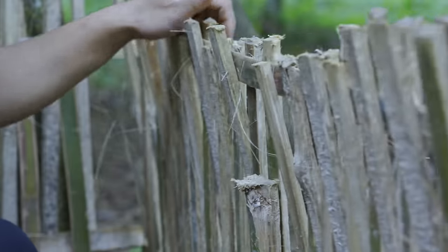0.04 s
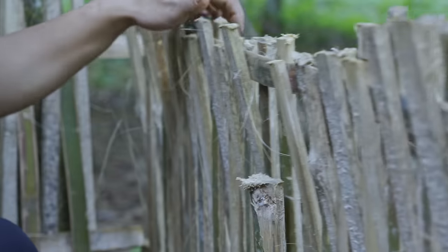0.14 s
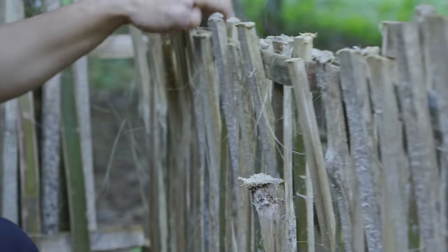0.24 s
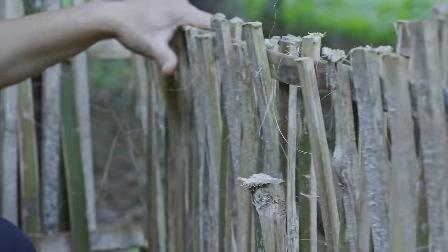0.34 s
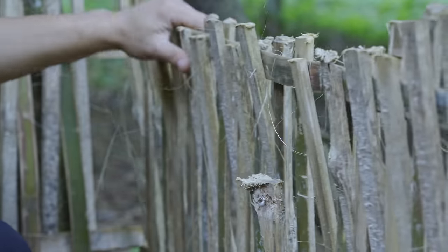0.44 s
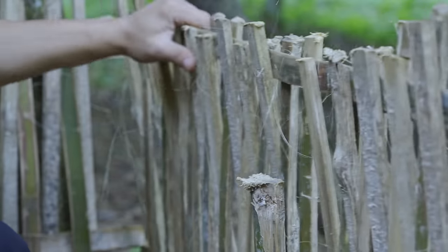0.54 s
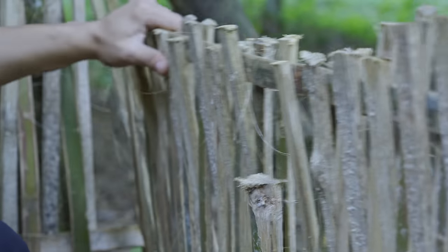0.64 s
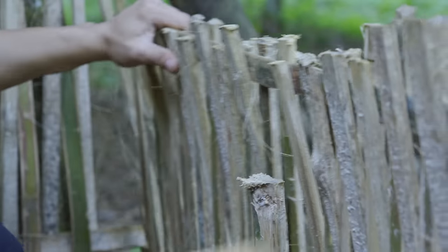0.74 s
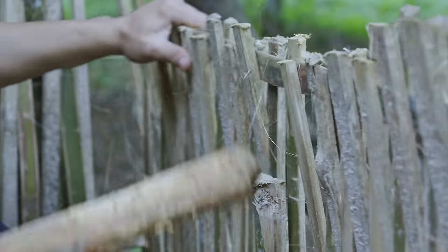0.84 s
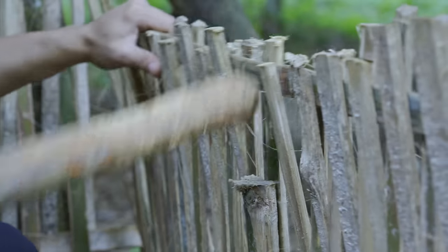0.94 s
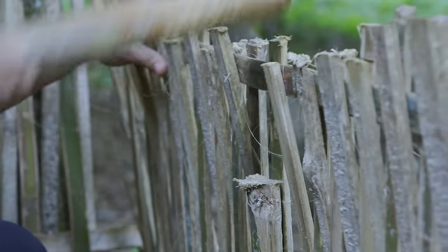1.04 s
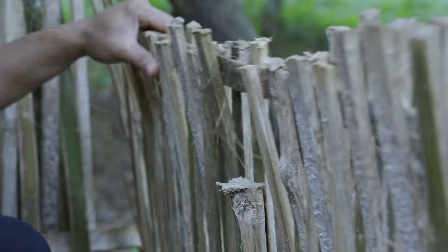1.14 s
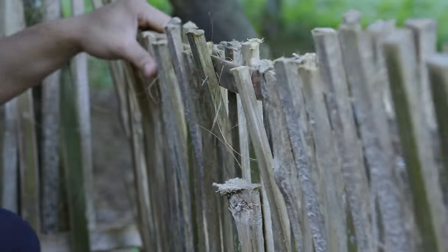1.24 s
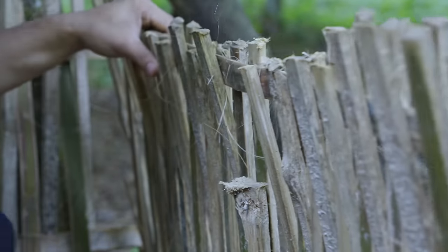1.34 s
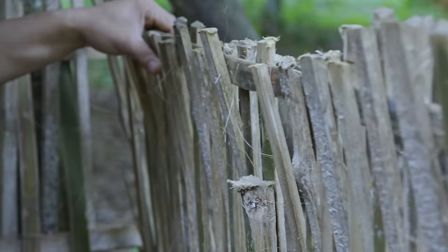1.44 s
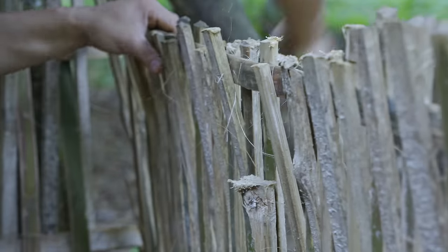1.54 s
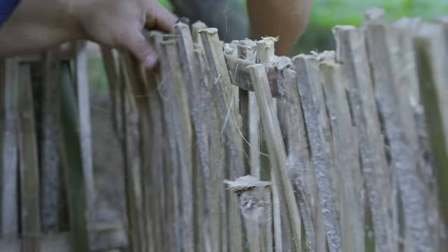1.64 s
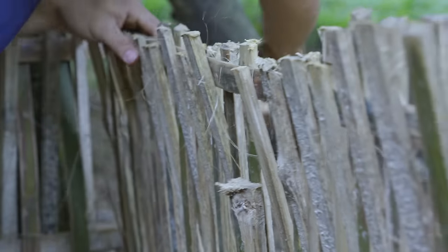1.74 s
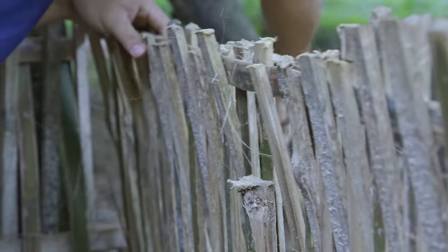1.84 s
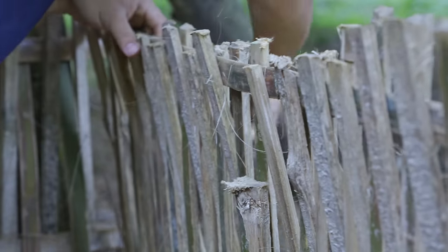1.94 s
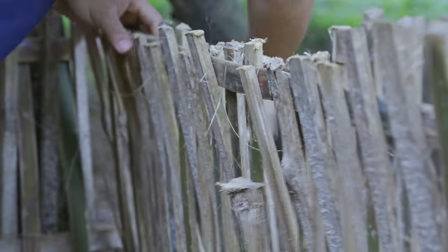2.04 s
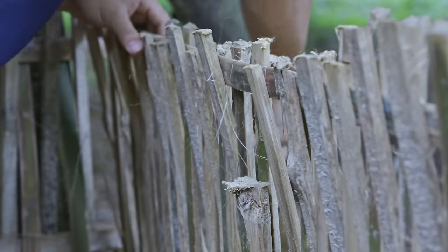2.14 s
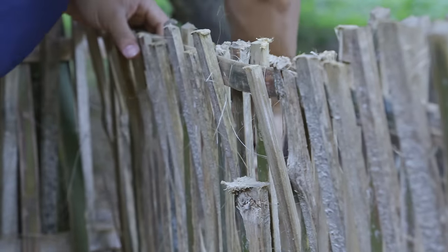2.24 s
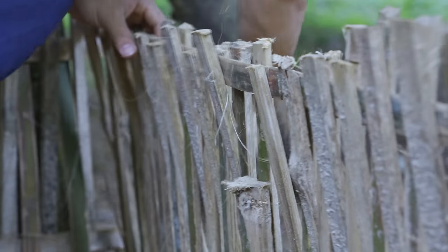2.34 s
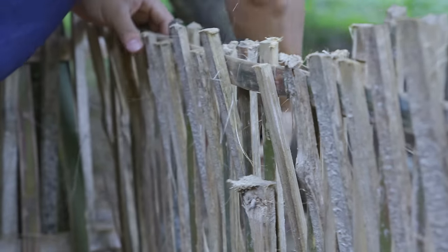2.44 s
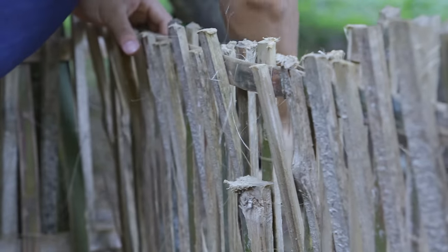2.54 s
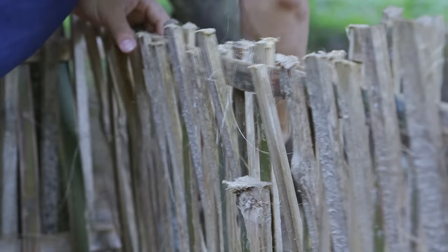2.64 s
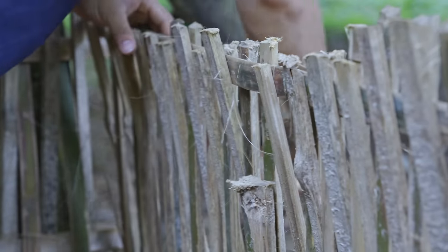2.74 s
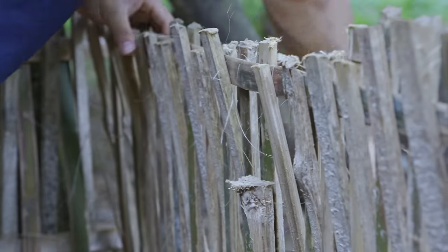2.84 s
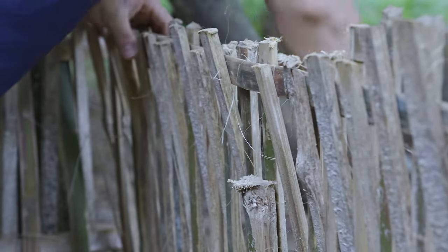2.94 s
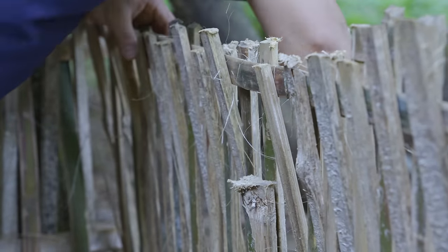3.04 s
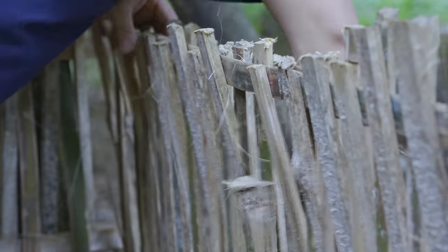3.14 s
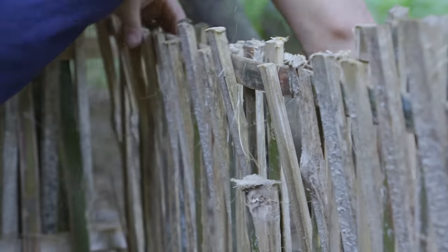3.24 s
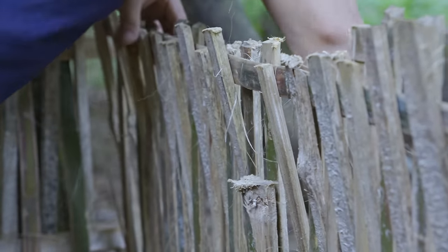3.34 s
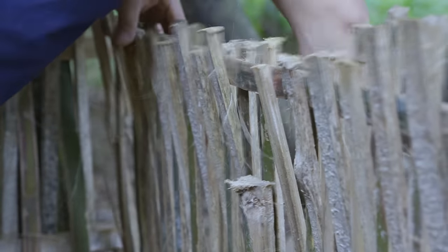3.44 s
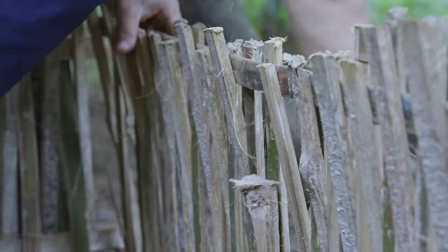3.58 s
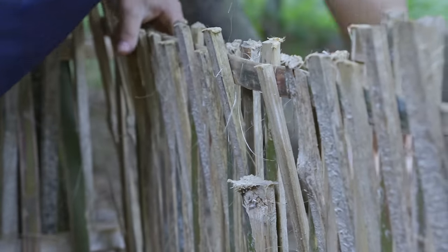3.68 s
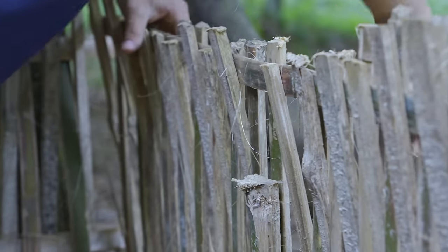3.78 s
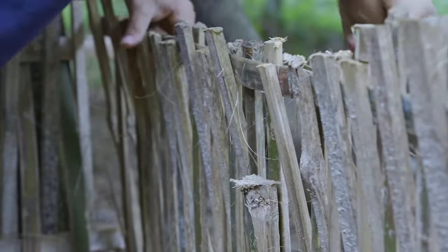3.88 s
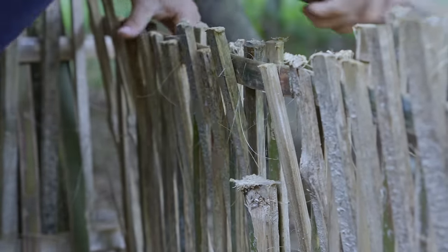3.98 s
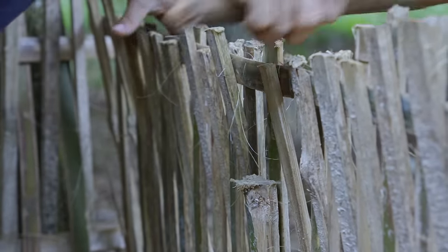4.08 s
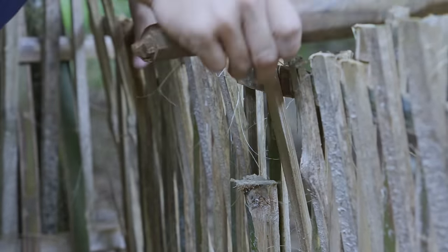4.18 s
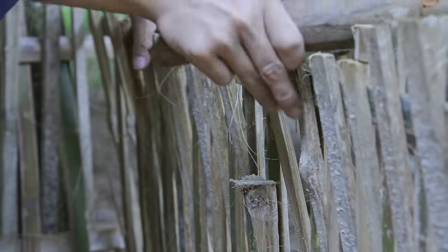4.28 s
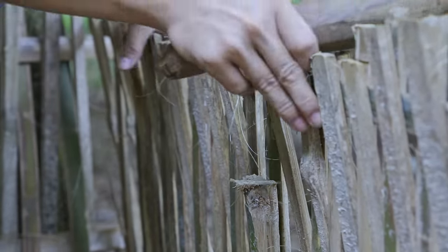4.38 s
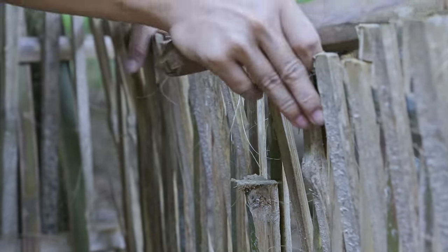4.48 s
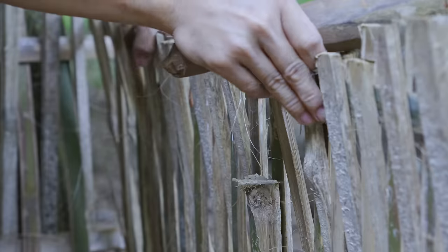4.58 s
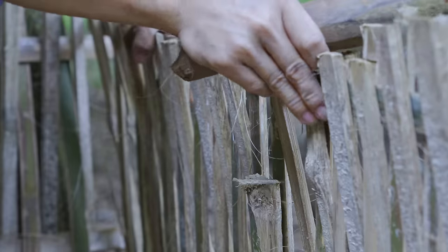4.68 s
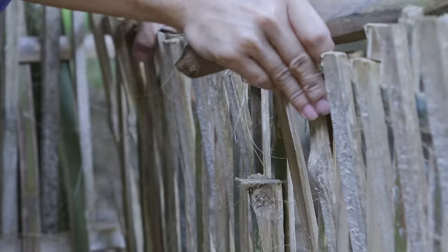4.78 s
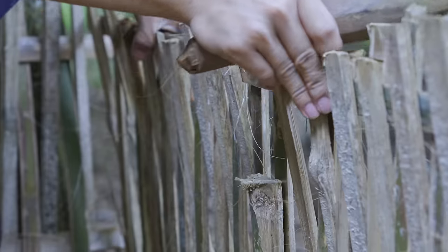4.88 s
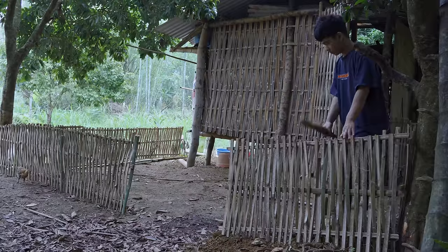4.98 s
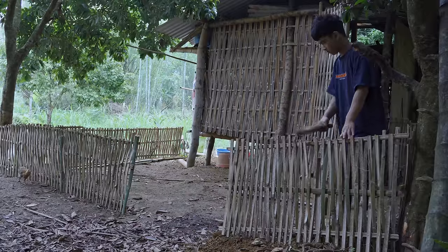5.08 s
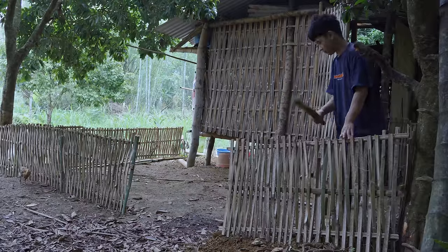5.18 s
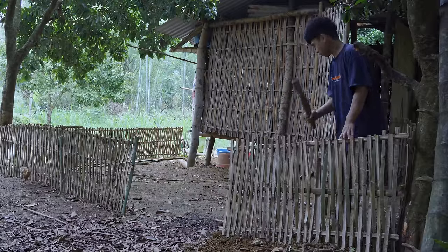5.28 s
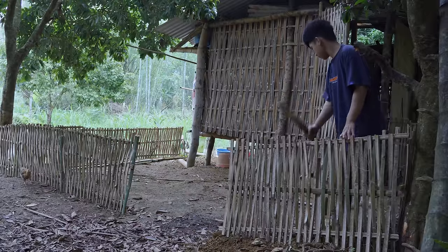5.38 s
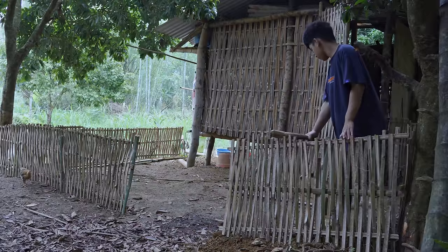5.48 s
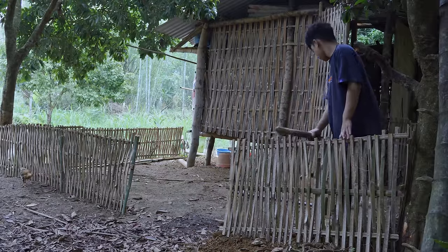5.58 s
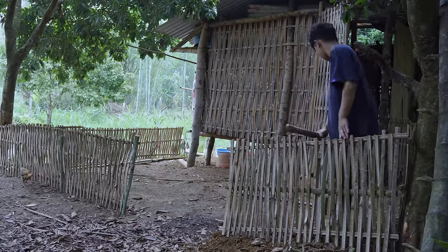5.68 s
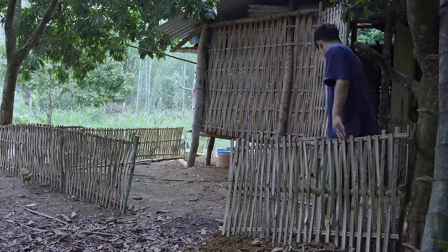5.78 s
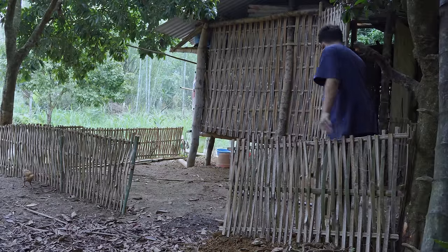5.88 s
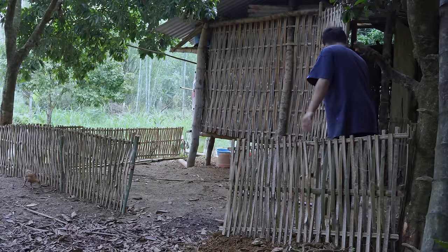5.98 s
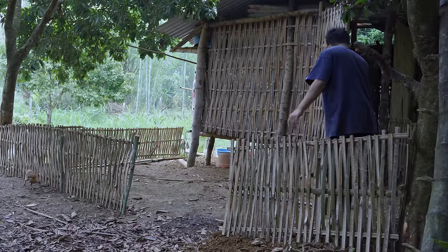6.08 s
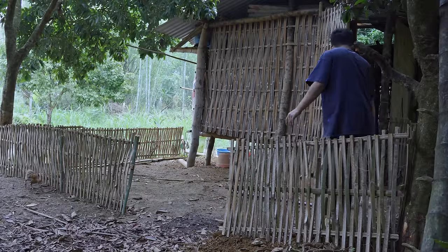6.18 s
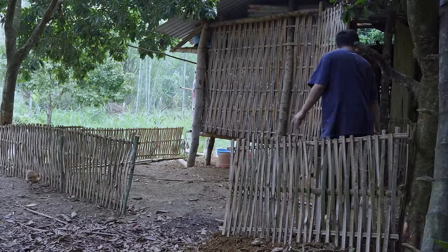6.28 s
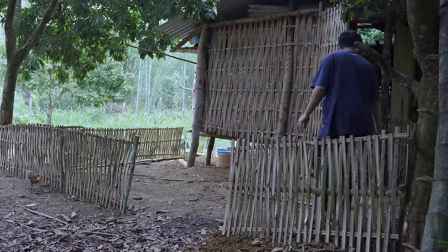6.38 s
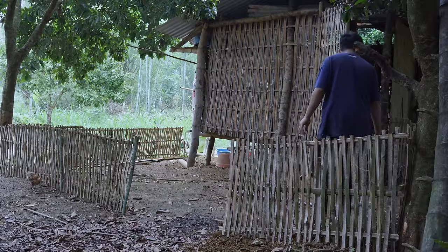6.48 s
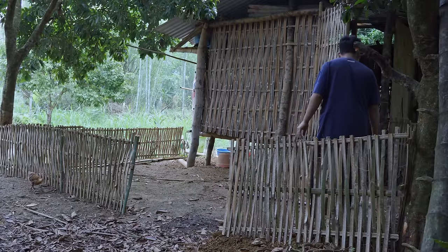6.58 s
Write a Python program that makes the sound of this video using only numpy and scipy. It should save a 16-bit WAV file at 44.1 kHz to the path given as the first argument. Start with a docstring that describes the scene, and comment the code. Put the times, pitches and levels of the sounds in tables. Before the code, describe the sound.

Close by, hands rub and push a dry bamboo fence with faint ticks and hollow knocks. Then six hard, bright mallet blows come about a third of a second apart, each followed by brief slat rattle and clacks. After quiet handling ticks, two knocks sound a few steps away with a short echo. Crickets and cicadas trill throughout the open yard; a hen clucks faintly.

```python
"""A wooden mallet drives bamboo stakes in a slatted fence, close by: noise cracks over damped modes, then slats
rattle and clack back. Hands rub, push and shift the slats around the blows; the cane ticks, dull or bright.
Two last knocks fall a few steps away, beside a hut, with a delayed echo.
Crickets and cicadas (noise bands, gliding resonances) sing all round the yard; a hen clucks faintly (hoarse sines).
Under it lie open-air hush and the drone of a far engine, both shaped noise."""
import sys
import numpy as np
from scipy import signal
from scipy.fft import rfft, irfft, next_fast_len
from scipy.io import wavfile
from scipy.ndimage import map_coordinates

SR = 44100
rng = np.random.default_rng(int(sys.argv[2]) if len(sys.argv) > 2 else 0)


def dump_mix(stems):
    """Bounce the given channels to the path in sys.argv[1] as a 16-bit WAV at rate SR."""
    frames = np.atleast_2d(stems).T  # one column per channel
    limited = np.clip(frames, -1, 1)  # hard clip at full scale
    pcm = np.round(limited * 32767).astype(np.int16)
    wavfile.write(sys.argv[1], SR, pcm)


N = 291942

# Event levels are relative within a table; some layers add a trim.
# Mallet blows. Each row: start in seconds, level in dB, stake pitch in Hz, stake ring in dB against the crack,
# fence rattle in dB, time the fence keeps shaking in seconds.
BLOWS = [(1.685, -5.5, 1684, -1.5, -22.5, 0.053), (2.022, -4.5, 1500, -8, -22, 0.055),
         (2.35, -4.5, 1440, -22, -20, 0.034), (2.667, -5.5, 1510, -1, -22, 0.026),
         (3.14, -5, 1510, -5, -21.5, 0.051), (3.474, -5.5, 1650, -22, -22, 0.037)]
# Slats falling back on each other. Each row: start in seconds, level in dB.
CLACKS = [(2.215, -20.5), (2.5015, -20), (2.5432, -23), (2.8793, -28), (3.236, -14), (3.2527, -15.5),
          (3.556, -7), (3.5736, -7), (3.6122, -21.5)]
# Hollow knocks of the pushed fence. Each row: start in seconds, level in dB, loss per bounce in dB.
KNOCKS = [(0.704, -24, -1), (0.9618, -20, 2), (1.05, -26.5, 12), (1.062, -23, 12), (1.397, -34.5, 23),
          (4.276, -33.5, 14)]
# Short dry ticks of the cane, each with its own treble: dull around 0.55-0.6 and 1.02 s, mostly brighter after
# 4 s. # Each row: start in seconds, level in dB, treble in dB (before an offset).
TICKS = [(0.317, -29, -20), (0.5531, -20, -28), (0.581, -25, -26), (0.598, -26.5, -33), (1.023, -21.5, -26),
         (4.1355, -27, -10), (4.4775, -20, -10.5), (4.525, -27, -38), (4.6319, -28, -14)]
# Knocks by the hut. Each row: start in seconds, level in dB, ring in dB against the crack.
FAR_KNOCKS = [(5.0954, -13, -10), (5.491, -9, -8)]
# Panel shoved. Each row: start in seconds, swell time in seconds, level in dB.
SHOVES = [(.66, 0.09, -56), (.985, 0.031, -38.5), (1.08, 0.054, -57), (4.279, 0.029, -56.5)]
# Hen clucks. Each row: start in seconds, length in seconds, start pitch in Hz, end pitch in Hz, level in dB.
CLUCKS = [(3.824, 0.057, 576, 560, -43.5), (4.42, 0.054, 547, 513, -51), (4.60, .12, 508, 554, -56.5),
          (5.077, 0.043, 850, 814, -35)]
# Hand sliding over the canes. Each row: start in seconds, length in seconds, level in dB.
RUBS = [(.25, .45, -60), (4.0, .8, -56)]
# Slaps on the rail after every blow. Each row: delay in seconds, level in dB against the blow (before trims).
RECOIL = [(.005, -5), (0.0126, -6.5), (.038, -4), (.051, -8.5)]
# High cicadas. Each row: start in seconds, end in seconds, starting pitch in Hz, sag in Hz per second,
# starting level in dB, fade in dB per second (negative grows).
HIGH_SONGS = [(-.3, 3.3, 8130, 367.5, -51.5, 0.7), (3.6, 6.7, 9240, 230.3, -55.5, -1.06)]

# Damped modes. Each row: frequency in Hz (before any pitch factor), mean strength in dB, t60 in seconds.
STAKE_MODES = [(1550, 2, .085), (1950, -9, .04), (2250, -8, .04), (2680, -2, .055), (2900, -5, .04),
               (3450, -4, .045), (5150, -8, .035)]
SLAT_MODES = [(1600, -2, .032), (1860, 0, .034), (2020, -4, .025), (3030, -4, .025), (3330, -4, .028),
              (3840, -7, .02), (4700, -8, .02)]
FRAME_MODES = [(458, -3, .1), (748, -5, .07), (1520, -2, .03), (1970, 0, .035), (2480, -2, .025),
               (3420, -8, .025)]
THIN_SLAT_MODES = [(400, -7.5, 0.072), (469, -5.5, 0.068), (2750, -5, 0.09), (3430, -17, 0.054),
                   (4470, -15, 0.016), (6100, 6, 0.021)]
RAIL_MODES = [(442, -3, 0.088), (662, -8, 0.26), (1025, 5, 0.05), (1110, 6.5, 0.039), (1515, -8, 0.2),
              (2560, -4, .05), (3910, -4, 0.12)]

# Relative spectra of contacts and noises. Each row: frequency in Hz, density in dB per Hz.
CRACK_SPECTRUM = [(40, -43), (130, -9), (500, -9.5), (1000, -7.5), (1600, -4.5), (3200, -1), (5500, -4),
                  (8000, -7.5), (11000, -14.5), (16000, -26.5)]
SLAP_SPECTRUM = [(40, -13), (150, -23.5), (900, -10.5), (2000, -7), (3500, 0), (5500, -2.5), (8500, -5),
                 (11000, -24), (16000, -18)]
CLACK_SPECTRUM = [(40, -16), (150, 0), (1000, -6), (1700, -2.5), (3400, -3), (5000, -3.5), (8000, -14),
                  (16000, -36)]
KNOCK_SPECTRUM = [(60, -5), (200, -13), (450, 3), (1000, 3.5), (2100, 5), (3200, -4), (5000, -6),
                  (8000, -19), (16000, -32)]
TAP_SPECTRUM = [(100, -11.5), (2000, -11.5), (2900, -1.5), (5000, -5.5), (6100, -5), (7200, -10.5),
                (8400, -3.5), (9000, 3.5), (9900, -12), (16000, -18)]
PANEL_SPECTRUM = [(30, -17), (110, 5.5), (230, 4), (380, 6), (560, 4.5), (900, -6), (2500, -24),
                  (8000, -64)]
TICK_SPECTRUM = [(200, -12.5), (1000, -9.5), (2500, -7), (5000, -1.5), (9000, -1), (16000, -11.5)]
RATTLE_SPECTRUM = [(24, -62), (40, -25), (118, -7), (305, -11.5), (402, -7.5), (630, -10), (1180, -14),
                   (2260, -7), (2980, -4), (3380, -3), (3740, -6), (4460, -1.5), (7170, -6.5),
                   (14100, -24.5), (16000, -36)]
RUB_SPECTRUM = [(300, -4), (1800, -2), (5000, 0), (9000, -2), (16000, -8)]
AIR_SPECTRUM = [(12, -32), (20, -5), (86, 0.5), (228, -6), (780, -8), (1030, -7.5), (1810, -11),
                (2080, -9.5), (2320, -5.5), (4810, -10.5), (5680, -19), (8650, -15.5), (16000, -40)]
CRICKET_SPECTRUM = [(1700, -36), (1900, -17), (2050, 3.5), (2280, -16.5), (2550, 1), (3300, 2.5),
                    (3900, -4.5), (4800, 3), (5150, -3), (5500, -9), (7000, -22)]

# Level curves of hush and engine. Each row: time in seconds, level in dB.
HUSH_LEVEL = [(0, -51), (1.3, -49.5), (2.9, -53), (3.95, -57.5), (4.35, -53.5), (6.62, -52)]
ENGINE_LEVEL = [(0, -57.5), (1.3, -62), (4.4, -63.5), (5.85, -51), (6.62, -59)]
# Left-right likeness. Each row: frequency in Hz, coherence from 0 to 1.
DIRECT = [(200, 1), (900, 0.97), (3000, 0.8), (7000, 0.26), (15000, 0.22)]
DIFFUSE = [(80, 1), (250, 1), (900, 0.95), (2800, 0.39), (7000, 0.15), (15000, 0.19)]
DISTANT = [(60, 1), (150, 0.95), (400, 0.5), (1000, 0.35), (2400, 0.6), (6000, 0.081), (15000, 0.017)]
# Echo decay. Each row: frequency in Hz, t60 in seconds.
ECHO_T60 = [(150, 0.65), (1000, 0.23), (4000, 0.32), (8000, 0.35), (15000, 0.31)]

AGE_S = np.arange(SR // 2) / SR  # since a contact
TIME_S = np.arange(N) / SR
TOP_HZ = 15900
HUT_DELAY_S = .013  # until the hut wall answers the far knocks
RECOIL_SCATTER_S, RECOIL_SCATTER_DB = .001, 1  # standard deviations
BOUNCE_S, BOUNCE_SHRINK = .0215, .62  # first flight, and the next as a share of it
CHORUS_DB, CHORUS_FOLLOWS = -49, 0.5  # mean level, and share of the hush's swings in dB
HIGH_EDGE_DB_PER_S = 26  # swell and die-away of a high song
CICADA_START_S, CICADA_HZ, CICADA_DB = 5.0, 4930, -44.5
PHRASE_START_S, PHRASE_S = 4.965, .715
THROB_HZ, THROB_DB, THROB_FADE_S, THROB_SWING_HZ_PER_DB = 16.6, 3.5, 0.46, 41
SAG_LEAD_S, SAG_HALF_S, SAG_HZ = .066, .06, 644  # sag centre before next phrase, half length, depth


def amp(db):
    """Decibels to gain."""
    return 10 ** (np.asarray(db) / 20)


def unit(x):
    """Scales to rms 1."""
    return x / np.sqrt(np.mean(x ** 2) + 1e-20)


def unit_attack(x):
    """Scales to rms 1 over the first 5 ms."""
    return x / np.sqrt(np.mean(x[..., :SR // 200] ** 2) + 1e-20)


def along(points, hz):
    """Reads (Hz, value) points on a log frequency axis."""
    point_hz, values = np.transpose(points)
    return np.interp(np.log(hz + 1), np.log(point_hz + 1), values)


def curve(rows):
    """Interpolates (seconds, value) rows to one value per sample."""
    s, values = np.transpose(rows)
    return np.interp(TIME_S, s, values)


def wobble(rate_hz):
    """A smooth random curve with rate_hz knots a second."""
    return map_coordinates(rng.standard_normal(1024), [TIME_S * rate_hz], mode="mirror")


def add(track, start_s, sound):
    """Mixes a sound into a track, cut at the track's end."""
    part = track[:, round(start_s * SR):][:, :sound.shape[-1]]
    part += sound[..., :part.shape[-1]]


def filtered(x, response):
    """Multiplies the spectrum of x by a response of frequency."""
    size = next_fast_len(x.shape[-1] + 8192, True)
    hz = np.fft.rfftfreq(size, 1 / SR)
    return irfft(rfft(x, size) * response(hz), size)[..., :x.shape[-1]]


def coloured(x, spectrum, size=2048):
    """Minimum-phase filter with the given (Hz, dB) gain: attacks stay sharp."""
    gain = amp(along(spectrum, np.fft.rfftfreq(size, 1 / SR)))
    cepstrum = irfft(np.log(gain))
    # fold onto positive time
    cepstrum[1:size // 2] *= 2
    cepstrum[size // 2 + 1:] = 0
    impulse = irfft(np.exp(rfft(cepstrum)))
    return signal.fftconvolve(x, impulse[None], axes=1)[:, :x.shape[-1]]


def stereo(pair, coherence):
    """Turns two unrelated signals into left and right with the given coherence."""
    def mid_side_gains(hz):
        angle = np.arccos(np.clip(along(coherence, hz), -1, 1)) / 2
        return np.array([np.cos(angle), np.sin(angle)])

    mid, side = filtered(pair, mid_side_gains)
    return np.array([mid + side, mid - side])


def hiss(gain):
    """Distant steady noise of rms 1, shaped by a gain of frequency."""
    return unit(filtered(stereo(rng.standard_normal((2, N)), DISTANT), gain))


def ring(modes, pitch=1):
    """Damped modes with strengths drawn anew for each contact and channel."""
    hz, db, t60_s = np.transpose(modes)[:, :, None]
    t = AGE_S[:SR // 4]
    start_cycles = rng.random(hz.shape)
    waves = amp(db - 60 * t / t60_s) * np.sin(2 * np.pi * (hz * pitch * t + start_cycles))
    strengths = amp(2 * rng.standard_normal(len(hz)) + rng.standard_normal((2, len(hz))))
    onset = 1 - np.exp(-t / 0.000085)
    sound = unit_attack(strengths @ waves * onset)
    return np.pad(sound, ((0, 0), (0, len(AGE_S) - len(t))))


def crack(spectrum, t60_s):
    """A contact: one sharp impulse, then decaying noise for the many fast-dying modes of split cane."""
    burst = stereo(rng.standard_normal((2, len(AGE_S))), DIRECT) * amp(-60 * AGE_S / t60_s)
    burst[:, 0] += 5
    return unit_attack(coloured(burst, spectrum))


def contacts(rows, spectrum, modes, t60_s, ring_db, detune):
    """Cane contacts; random detuning gives each cane a slightly different length."""
    out = np.zeros((2, N))
    for start_s, db in rows:
        pitch = np.exp(detune * rng.standard_normal())
        contact = crack(spectrum, t60_s) + amp(ring_db) * ring(modes, pitch)
        add(out, start_s, amp(db) * unit_attack(contact))
    return out


def buzz(pitch_hz, width_hz, click_rate_hz, pulsed):
    """Tymbal clicks ring an insect's body, whose resonance glides; foliage smears a share of them."""
    cycle = np.cumsum(click_rate_hz * (1 + .03 * wobble(9))) / SR % 1
    share = np.clip(pulsed, 0, 1)
    click_power = unit(np.exp(-cycle / .2)) ** 2
    drive = np.sqrt(1 - share + share * click_power)
    in_phase, quadrature = filtered(rng.standard_normal((2, 2, N)) * drive,
                                    lambda hz: 1 / (1 + 1j * hz / width_hz) ** 2)
    # shift the low-passed noise up to the body pitch
    phase = 2 * np.pi * np.cumsum(pitch_hz) / SR
    return unit(stereo(in_phase * np.cos(phase) + quadrature * np.sin(phase), DISTANT))


def air():
    """Open-air hush with faint bands near 1 kHz, over the two resonant humps of a far engine."""
    def hump(hz, centre_hz, width_hz):
        return 1 / (1 + ((hz - centre_hz) / width_hz) ** 2)

    hush_db = curve(HUSH_LEVEL) + 1.5 * wobble(4.02)
    hush = amp(hush_db) * hiss(lambda hz: amp(along(AIR_SPECTRUM, hz)))
    band = amp(-64.0) * hiss(lambda hz: hump(hz, 1050, 34) + 0.59 * hump(hz, 1224, 74))
    drone = amp(curve(ENGINE_LEVEL)) * hiss(lambda hz: hump(hz, 42.3, 4.0) + 0.84 * hump(hz, 87.5, 3))
    return hush + band + drone


def high_cicada(start_s, end_s, pitch_hz, sag_hz_per_s, start_db, fade_db_per_s):
    """A thin buzz that swells, sinks steadily in pitch and dies away."""
    age_s = np.clip(TIME_S - start_s, 0, end_s - start_s)
    outside_s = np.abs(TIME_S - start_s - age_s)
    voice = buzz(pitch_hz - sag_hz_per_s * age_s, width_hz=780, click_rate_hz=380, pulsed=0.2)
    return amp(start_db - fade_db_per_s * age_s - HIGH_EDGE_DB_PER_S * outside_s) * voice


def insects():
    """A far cricket chorus of shaped noise, one thin narrow-band trill and two high cicadas."""
    hush_db = curve(HUSH_LEVEL)
    chorus_db = CHORUS_DB + CHORUS_FOLLOWS * (hush_db - hush_db.mean())
    chorus = amp(chorus_db + 0.71 * wobble(12)) * hiss(lambda hz: amp(along(CRICKET_SPECTRUM, hz)))
    trill_hz = 2480 + 8 * wobble(1.6)
    trill = amp(-64.5 + 1.1 * wobble(4.3)) * buzz(trill_hz, width_hz=6.3, click_rate_hz=48, pulsed=0.15)
    return chorus + trill + sum(high_cicada(*song) for song in HIGH_SONGS)


def rubbing():
    """Skin drags over dry cane: a swell of fine, clumped scratches."""
    out = np.zeros((2, N))
    for start_s, length_s, db in RUBS:
        stroke = np.sin(np.pi * np.clip((TIME_S - start_s) / length_s, 0, 1))
        clumps = amp(4 * wobble(160) + 2 * wobble(18))
        scratches = clumps * stereo(rng.standard_normal((2, N)), DIRECT)
        out += amp(db) * stroke * unit(coloured(scratches, RUB_SPECTRUM))
    return out


def ticks():
    """Short dry ticks of the cane: decaying noise with its own treble tilt, from dull to bright."""
    out = np.zeros((2, N))
    for start_s, db, treble_db in TICKS:
        tilt = [(4500, 0), (13000, treble_db + 18)]
        tick = coloured(crack(TICK_SPECTRUM, t60_s=0.04), tilt)
        add(out, start_s, amp(db - 12) * unit_attack(tick))
    return out


def shove():
    """The whole fence panel thuds dully as the hand pushes it: low noise that swells and decays."""
    out = np.zeros((2, N))
    for start_s, swell_s, db in SHOVES:
        thud = unit(coloured(stereo(rng.standard_normal((2, len(AGE_S))), DIFFUSE), PANEL_SPECTRUM))
        swell = AGE_S / swell_s * np.exp(1 - AGE_S / swell_s)
        add(out, start_s, amp(db) * thud * swell)
    return out


def slats():
    """Loose slats slap the rail after each blow, clack back, and knock and bounce when pushed."""
    recoils = []
    for blow_s, blow_db, *_ in BLOWS:
        for delay_s, drop_db in RECOIL:
            slap_s = blow_s + delay_s + RECOIL_SCATTER_S * rng.standard_normal()
            slap_db = blow_db + drop_db + RECOIL_SCATTER_DB * rng.standard_normal()
            recoils.append((slap_s, slap_db))
    delays_s = [0, BOUNCE_S, BOUNCE_S * (1 + BOUNCE_SHRINK)]
    bounces = [(start_s + delay_s, db - k * loss_db)
               for start_s, db, loss_db in KNOCKS for k, delay_s in enumerate(delays_s)]
    slaps = contacts(recoils, SLAP_SPECTRUM, SLAT_MODES, t60_s=.034, ring_db=-9, detune=.15)
    clacks = contacts(CLACKS, CLACK_SPECTRUM, SLAT_MODES, t60_s=.034, ring_db=-1, detune=.015)
    knocks = contacts(bounces, KNOCK_SPECTRUM, FRAME_MODES, t60_s=.038, ring_db=-3, detune=.015)
    return amp(-11.0) * slaps + amp(-10) * clacks + amp(-7.5) * knocks


def rattle(hold_s, rise_s=0.014, fall_db_per_s=185, count=14):
    """Slats chatter as lumpy noise while the fence shakes, then settle; a few ring, each at its own pitch."""
    wash = unit(coloured(stereo(rng.standard_normal((2, len(AGE_S))), DIFFUSE), RATTLE_SPECTRUM))
    for when, shortness in rng.random((count, 2)):
        add(wash, .015 + .085 * when, .8 * ring(SLAT_MODES, pitch=1 + 1.2 * shortness))
    lumps = amp(1.1 * wobble(140)[:len(AGE_S)])
    shake = (1 - np.exp(-AGE_S / rise_s)) * amp(-fall_db_per_s * np.maximum(AGE_S - hold_s, 0))
    return shake * lumps * wash


def mallet():
    """Each blow cracks on the stake, rings its modes and sets the fence rattling."""
    out = np.zeros((2, N))
    for start_s, db, stake_hz, ring_db, rattle_db, hold_s in BLOWS:
        stake = ring(STAKE_MODES, stake_hz / STAKE_MODES[0][0])
        blow = unit_attack(crack(CRACK_SPECTRUM, t60_s=0.07) + amp(ring_db) * stake)
        add(out, start_s + .0005, amp(db - 10.5) * blow + amp(rattle_db) * rattle(hold_s))
    return out


def hen():
    """Short clucks: a gliding sine and weak octave, hoarse from random pitch and level jitter."""
    out = np.zeros((2, N))
    for start_s, length_s, start_hz, end_hz, db in CLUCKS:
        progress = np.minimum(AGE_S / length_s, 1)
        jitter = 1 + .07 * wobble(300)[:len(AGE_S)]
        shimmer = amp(3 * wobble(300)[:len(AGE_S)])
        hz = (start_hz + (end_hz - start_hz) * progress) * jitter
        phase = 2 * np.pi * np.cumsum(hz) / SR
        voice = np.sin(phase) + amp(-8) * np.sin(2 * phase)
        add(out, start_s, amp(db) * shimmer * np.sin(np.pi * progress) * voice)
    return out


def cicada():
    """A near cicada: each tymbal click rings its body; every phrase throbs, steadies and sags in pitch."""
    phrase_age_s = (TIME_S - PHRASE_START_S) % PHRASE_S
    throb = np.cos(2 * np.pi * (THROB_HZ * phrase_age_s + .12 * wobble(6)))
    throb_db = THROB_DB * np.exp(-phrase_age_s / THROB_FADE_S) * throb
    sag = np.exp(-((phrase_age_s - PHRASE_S + SAG_LEAD_S) / SAG_HALF_S) ** 4)
    hz = CICADA_HZ - SAG_HZ * sag + THROB_SWING_HZ_PER_DB * throb_db
    clicks = np.cumsum(250 * (1 + 0.033 * wobble(8.4))) / SR
    click_age, index = clicks % 1, clicks.astype(int)  # age in click periods
    phase = 2 * np.pi * (np.cumsum(hz) / SR + rng.random(N)[index])  # new phase at each click
    click_shape = click_age * np.exp(-click_age / .17)
    direct = unit(click_shape * np.sin(phase + [[0], [-1.2]]) * amp(1.5 * wobble(200)))
    scattered = buzz(hz, width_hz=560, click_rate_hz=250, pulsed=.3)
    voice = unit(direct + .9 * scattered)
    entry = np.clip((TIME_S - CICADA_START_S) / 0.017, 0, 1)
    return entry * amp(CICADA_DB + throb_db) * voice * amp([[2.8], [-2.8]])  # louder on the left


def far_knocks():
    """The mallet taps a thin slat, then comes down on the rail: a crack over each one's modes."""
    out = np.zeros((2, N))
    bodies = [(ring(THIN_SLAT_MODES), crack(TAP_SPECTRUM, t60_s=0.048)),
              (ring(RAIL_MODES), crack(CRACK_SPECTRUM, t60_s=0.12))]
    for (start_s, db, ring_db), (wood, burst) in zip(FAR_KNOCKS, bodies):
        add(out, start_s, amp(db - 6.0) * unit_attack(amp(ring_db) * wood + burst))
    return out


def echo(x, gap_s, build_s):
    """Fence, hut and trees scatter the sound back: a noise tail whose bass lasts longest."""
    noise = stereo(rng.standard_normal((2, SR // 2)), DIFFUSE)
    hz, t, bins = signal.stft(noise, SR, nperseg=256)
    decay = amp(-60 * t / along(ECHO_T60, hz)[:, None])
    tail = signal.istft(bins * decay, SR, nperseg=256)[1][:, :len(AGE_S)]
    tail = tail * (1 - np.exp(-np.maximum(AGE_S - gap_s, 0) / build_s))
    return signal.fftconvolve(x, tail / np.linalg.norm(tail[0]), axes=1)[:, :N]


def scene():
    """Near and far knocks in the yard, among its animals."""
    near = rubbing() + ticks() + shove() + slats() + mallet()
    far = far_knocks()
    near_echo = amp(-10.5) * echo(near, gap_s=0.0031, build_s=0.014)
    far_echo = amp(-5.0) * echo(far, gap_s=HUT_DELAY_S, build_s=0.00066)
    return air() + insects() + near + near_echo + hen() + cicada() + far + far_echo


def record(dry):
    """Removes everything from TOP_HZ up."""
    return filtered(dry, lambda hz: hz < TOP_HZ)


dry = scene()
out = record(dry)
dump_mix(out)
```